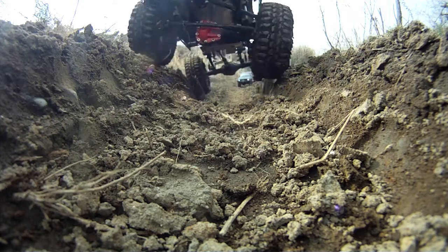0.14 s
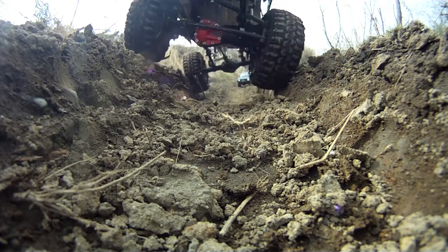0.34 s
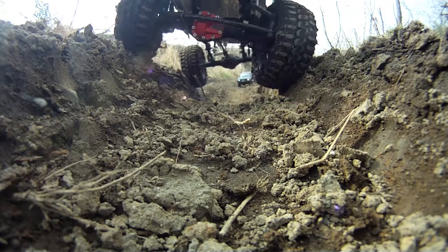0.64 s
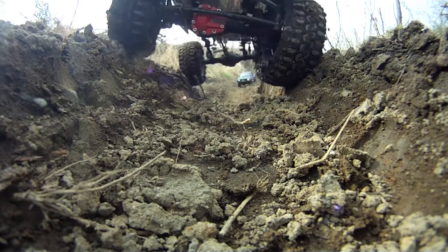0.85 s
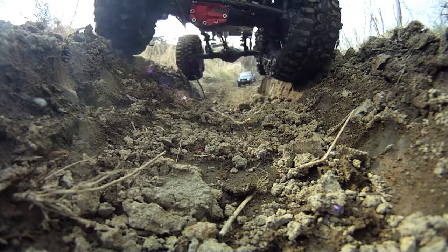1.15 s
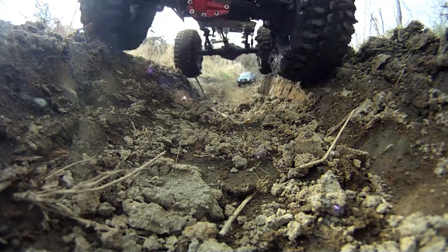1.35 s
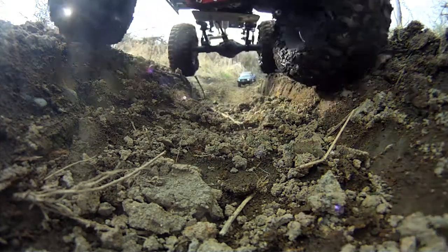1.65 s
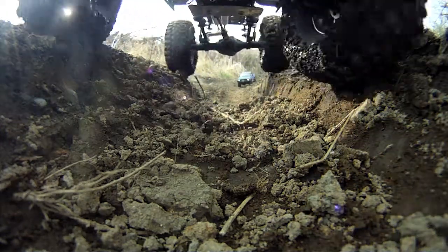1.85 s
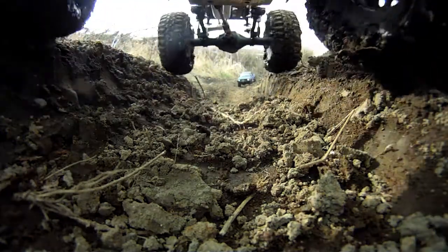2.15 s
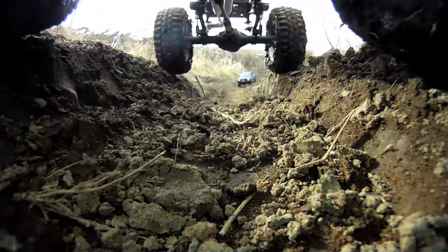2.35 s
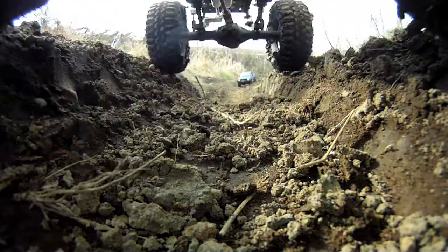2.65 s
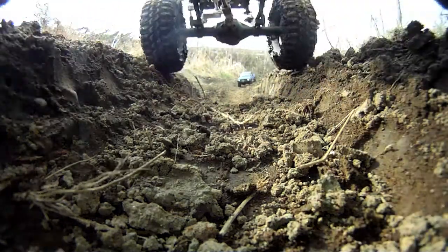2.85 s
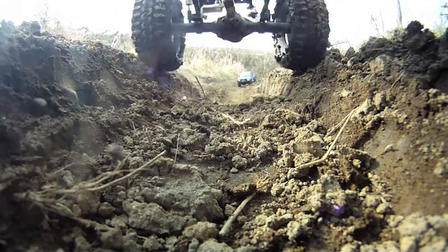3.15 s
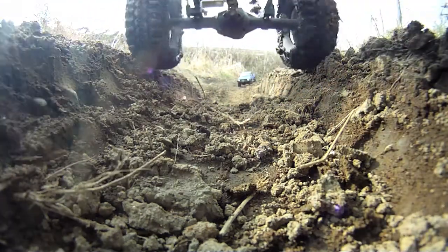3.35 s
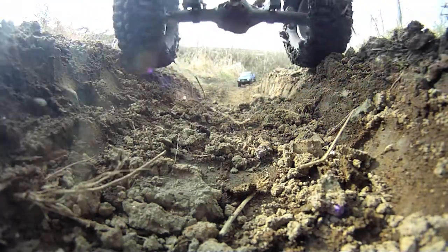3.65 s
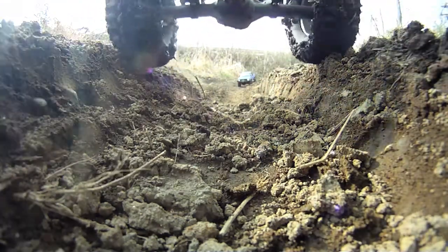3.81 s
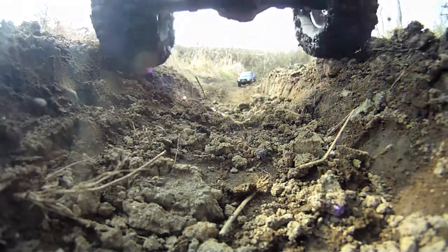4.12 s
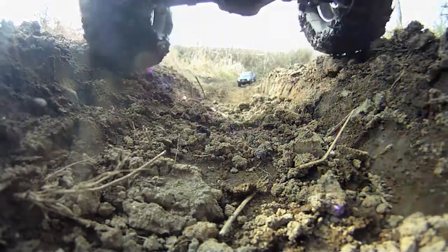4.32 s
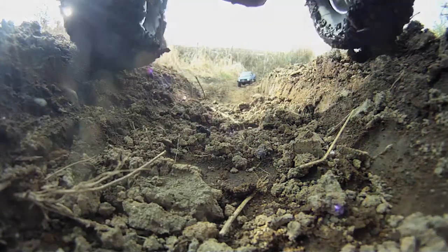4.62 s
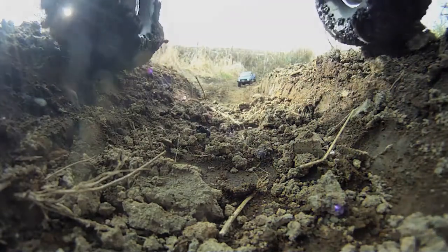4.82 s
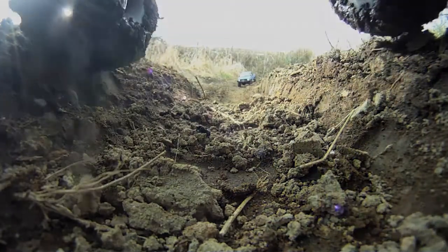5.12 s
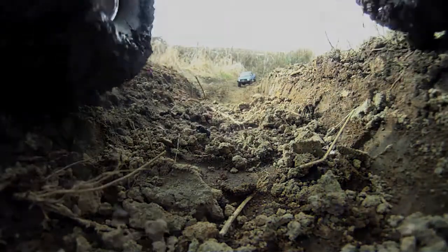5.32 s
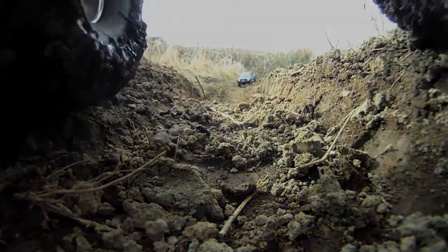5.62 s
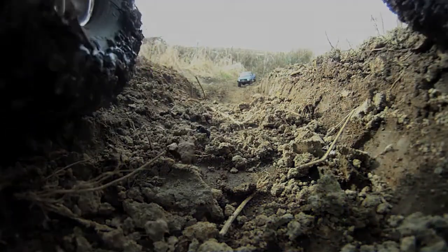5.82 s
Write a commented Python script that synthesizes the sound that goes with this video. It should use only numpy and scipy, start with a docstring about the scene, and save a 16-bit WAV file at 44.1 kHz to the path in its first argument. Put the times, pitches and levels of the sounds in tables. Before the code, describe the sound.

Thin gear whirring and a high whistle from a remote-controlled truck crawling overhead, with small clacks and one sharp pebble hit.

```python
"""Gear teeth rattle and sing as a small electric RC crawler creeps along a dirt rut, over a camera
on the ground. Front axle, gearbox and rear axle pass in turn, and the speed controller whistles over
soft outdoor air. Tyres scuff, crumbs of earth drop, the rear axle squeaks once, chassis panels buzz,
slack gears clack and one pebble cracks against the camera case. The camera's coarse sampling adds a
glassy edge."""
import sys
import numpy as np
from scipy import signal
from scipy.fft import rfft, irfft
from scipy.io import wavfile
from scipy.ndimage import uniform_filter1d

SR = 44100
rng = np.random.default_rng(int(sys.argv[2]) if len(sys.argv) > 2 else 0)


def put_to_file(sound):
    """Save the sound as 16-bit audio at rate SR, in the file named by the first command-line argument."""
    columns = np.atleast_2d(sound).T  # one column per channel
    safe = np.clip(columns, -1, 1)
    whole_steps = np.round(safe * 32767)
    wavfile.write(sys.argv[1], SR, whole_steps.astype(np.int16))


N = 263277
T = np.arange(N) / SR
CAMERA_RATE_HZ = 12000
PINION_TEETH, COMMUTATOR_BARS = 10, 3
OVERHEAD_S, CROSSING_S = 3.74, 2.5  # whole truck


def undb(db):
    """Decibels to gain."""
    return 10 ** (np.asarray(db) / 20)


def unit(x):
    """Scale to rms 1."""
    return x / np.sqrt(np.mean(x ** 2))


def curves(table):
    """Table columns, linearly interpolated in time."""
    times, *columns = np.transpose(table)
    return [np.interp(T, times, column) for column in columns]


def walk(rate_hz):
    """Random wander, rms 1."""
    knots = rng.standard_normal(4096)
    return unit(np.interp(T * rate_hz, np.arange(len(knots)), knots))


def bump(time_s, length_s):
    """Bell-shaped swell, height 1."""
    return np.exp(-(2 * (T - time_s) / length_s) ** 2)


def nearness(overhead_s, crossing_s, db_per_doubling=-20):
    """Pass-over gain, steep as the rut walls shade the source; it travels its height in crossing_s."""
    distance = np.hypot(1, (T - overhead_s) / crossing_s)
    return undb(db_per_doubling * np.log2(distance))


def band(x, hz, width_hz):
    """Resonator applied twice for steep skirts; centre gain 1."""
    b, a = signal.iirpeak(hz, hz / (1.55 * width_hz), fs=SR)
    return signal.lfilter(b, a, signal.lfilter(b, a, x))


def ring(force, resonances):
    """Driven resonances, levelled to a running rms of 1."""
    y = sum(undb(db) * band(force, hz, width_hz) for hz, width_hz, db in resonances)
    return y / np.sqrt(uniform_filter1d(y ** 2, size=5000) + 1e-18)


def add(out, time_s, sound, peak_db):
    """Mix in a short sound at the given peak."""
    i = int(time_s * SR)
    out[i:i + len(sound)] += (undb(peak_db) * sound / np.abs(sound).max())[:N - i]


def grains(rate_hz, spread_db):
    """Random clicks, mostly small, a few large."""
    hits = rng.random(N) < rate_hz / SR
    return hits * undb(spread_db * np.minimum(rng.exponential(size=N), 3))


# gear speed (time [s], mesh rate [Hz])
GEAR_SPEED = [(0, 243.6), (.75, 252), (1.25, 319.8), (1.45, 341.7), (1.56, 331.8), (1.76, 349.3),
              (1.88, 331.3), (1.98, 358), (2.25, 311.9), (2.65, 229.4), (2.98, 270), (3.12, 247.8),
              (3.35, 300.1), (3.72, 200.9), (4.12, 245.7), (4.5, 199.9), (4.97, 200.4), (5.28, 320),
              (5.44, 183), (5.97, 217.7)]


def mesh_rate():
    """Teeth engaging per second."""
    return curves(GEAR_SPEED)[0]


def tooth_force(teeth_passed, rolling, scatter_db=4, slop_teeth=0.13, rub=0.51, wear=0.8):
    """An even push per tooth when rolling; otherwise loose taps and rubbing."""
    tooth = np.arange(1, int(teeth_passed[-1]))
    # each pinion tooth's own error repeats once per motor turn
    own_error = rng.standard_normal((PINION_TEETH, 2))
    own_error = (own_error - own_error.mean(axis=0)) / own_error.std(axis=0)
    random_error = rng.standard_normal((4096, 2))[tooth]
    error = wear * own_error[tooth % PINION_TEETH] + np.sqrt(1 - wear ** 2) * random_error
    timing, strength = error.T
    tap_at = np.interp(tooth + slop_teeth * timing, teeth_passed, np.arange(N)).astype(int)
    taps = np.zeros(N)
    taps[tap_at] = undb(scatter_db * np.clip(strength, -2, 2))
    rubbing = rng.standard_normal(N) * np.exp(-2 * (teeth_passed % 1))
    loose = unit(unit(taps) + rub * unit(rubbing))
    even = unit(np.diff(np.floor(teeth_passed), prepend=0))
    return rolling * even + np.sqrt(1 - rolling ** 2) * loose


# part resonances (frequency [Hz], width [Hz], gain [dB])
FRONT_AXLE_MODES = [(3665, 214, 4.5), (3786, 54, 0.5), (3848, 40, 4), (4550, 670, -15)]
GEARBOX_MODES = [(2877, 94, 7.5), (3353, 100, 14.5), (3411, 63, 18.5), (4550, 300, -2), (5230, 560, -10)]
REAR_AXLE_MODES = [(2164, 26, 5.5), (2263, 120, 9.5), (2397, 130, -5), (2670, 130, -16), (4030, 770, -11.5)]
CHASSIS_MODES = [(624, 42, -5.5), (793, 49, -5), (1534, 110, -9), (1678, 170, -2.5), (1947, 87, -1.5)]
MOTOR_CAN_MODES = [(1062, 49, -0.5), (1120, 56, -6)]
# pass of each part above, same order
# (overhead [s], crossing [s], direct gain [dB], frame-borne gain [dB], tightness [0-1])
PART_PASSES = [(1.82, 0.97, -53, -56, 0.96), (3.1, 1.35, -52, -54, 1), (4.53, 1.63, -54, -58, 0.73),
               (2.0, 1.0, -65, -62, 0.53), (2.95, 3.3, -64.5, -73, .7)]
# evenness of the mesh (time [s], rolling share [0-1])
ROLLING_SHARE = [(0, 0.75), (1.2, 0), (1.42, 0.45), (2.0, 0.4), (2.35, 0.72), (2.6, 0.28), (3.8, 0.51),
                 (5.97, 0.3)]
# load climbing (+) or leaving (-) a lump
# (time [s], length [s], front axle and gearbox gain [dB], rear axle gain [dB])
LUMP_LOADS = [(1.03, 0.2, -5, 0), (1.5, 0.23, 0.5, 0.5), (1.92, .12, -4, -3), (2.15, 0.36, 3, -0.5),
              (2.377, 0.13, -5, -6), (2.63, 0.16, 3.5, -1.5), (3.09, 0.13, 4, -2), (3.427, 0.068, 4.5, 4),
              (4.154, .2, 1, 0.5), (4.55, 0.29, -2, 0), (4.77, .2, -4, 2), (5.34, 0.78, 6, 3),
              (5.25, 0.17, 3.5, 4.5), (5.97, 0.14, -7, 1.5)]


def drivetrain(mesh_hz, flutter=0.003, judder_db=1.65, db_per_octave=2.5, cruise_hz=265):
    """The gears shake five parts of the truck, louder with speed, load and nearness."""
    teeth_passed = np.cumsum(mesh_hz * (1 + flutter * walk(60))) / SR
    rolling = np.clip(curves(ROLLING_SHARE)[0], 0, 0.95)
    frame = nearness(OVERHEAD_S, CROSSING_S)
    front_db = sum(db * bump(time_s, length_s) for time_s, length_s, db, _ in LUMP_LOADS)
    rear_db = sum(db * bump(time_s, length_s) for time_s, length_s, _, db in LUMP_LOADS)
    parts = ((FRONT_AXLE_MODES, front_db), (GEARBOX_MODES, front_db), (REAR_AXLE_MODES, rear_db),
             (CHASSIS_MODES, 0), (MOTOR_CAN_MODES, 0))
    sound = np.zeros(N)
    for (modes, load_db), part_pass in zip(parts, PART_PASSES):
        overhead_s, crossing_s, direct_db, frame_db, tightness = part_pass
        direct = undb(direct_db) * nearness(overhead_s, crossing_s)
        gain = undb(load_db) * np.hypot(direct, undb(frame_db) * frame)
        sound += gain * ring(tooth_force(teeth_passed, rolling * tightness), modes)
    speed_db = db_per_octave * np.log2(mesh_hz / cruise_hz)
    lug_db = judder_db * walk(45)  # tread lugs load the gears unevenly
    return sound * undb(speed_db + lug_db)


# whistle's octave, following the throttle (time [s], relative level [dB], ripple depth [dB])
WHISTLE_OCTAVE = [(0, -88, 6), (.95, -92, -14), (1.4, -79.5, -16), (2.1, -78.5, -15), (2.7, -81.5, 0),
                  (3.3, -78, -10), (3.52, -70.5, -16), (3.69, -83, -11), (4.0, -66.5, -14),
                  (4.5, -68.5, -7.5), (4.8, -67, -2), (5.08, -69.5, 1), (5.27, -81.5, 9.5), (5.97, -77, -5)]


def controller_whistle(mesh_hz, switch_hz=2966, tone_db=-62, sap_db=-6, octave_gain_db=9, waver_db=0.9):
    """Switched current makes the motor sing; commutator bars ripple the octave and sap the tone."""
    level_db, depth_db = curves(WHISTLE_OCTAVE)
    ripple = undb(level_db + depth_db)
    phase = 2 * np.pi * switch_hz * T
    motor_turns = np.cumsum(mesh_hz) / SR / PINION_TEETH
    commutation = 1.2 * np.cos(2 * np.pi * COMMUTATOR_BARS * motor_turns)
    tone = undb(tone_db + sap_db * ripple / ripple.max()) * np.sin(phase)
    tone *= nearness(overhead_s=4.05, crossing_s=3.2)
    octave = undb(octave_gain_db) * (undb(level_db) + ripple * commutation) * np.sin(2 * phase)
    return np.sqrt(2) * (tone + octave) * undb(waver_db * walk(11))


# background spectrum (frequency [Hz], relative density [dB])
AIR_SPECTRUM = [(15, -36), (30, -1.5), (50, 0), (100, -1), (200, -4.5), (450, -10), (1000, -13.5),
                (1900, -15.5), (2600, -15.5), (3600, -12.5), (4300, -18), (5800, -23)]


def air(level_db=-58, waver_db=0.6):
    """Low outdoor rush under thin microphone hiss."""
    freqs = np.fft.rfftfreq(N, 1 / SR)
    hz, db = np.transpose(AIR_SPECTRUM)
    colour = undb(np.interp(np.log(freqs + 1), np.log(hz), db)) * (freqs < CAMERA_RATE_HZ / 2)
    noise = unit(irfft(rfft(rng.standard_normal(N)) * colour, N))
    return noise * undb(level_db + waver_db * walk(9))


# rubber on the bank (time [s], length [s], level [dB])
TYRE_SCUFFS = [(0.119, 0.017, -52), (0.408, 0.073, -56.5), (1.793, 0.031, -59)]


def tyres(crunch_db=-71):
    """Rubber scuffs the bank; sparse soil grains crack under the lugs."""
    swell = sum(undb(db) * bump(time_s, length_s) for time_s, length_s, db in TYRE_SCUFFS)
    scuff = unit(band(grains(rate_hz=990, spread_db=5.5), hz=1750, width_hz=1200))
    crunch = unit(band(grains(rate_hz=80, spread_db=11), hz=1000, width_hz=1200))
    return swell * scuff + undb(crunch_db) * nearness(OVERHEAD_S, CROSSING_S) * crunch


# earth landing by the camera (time [s], relative peak [dB], centre [Hz])
CRUMB_FALLS = [(0.228, -50, 2300), (1.123, -51, 681), (1.321, -49, 883), (1.795, -46, 1110),
               (2.697, -51, 651), (2.959, -45.5, 630), (3.009, -43, 1050), (3.256, -44, 1967),
               (3.482, -42, 1621), (3.523, -43, 863), (3.791, -37, 1119), (3.795, -34, 1440),
               (3.827, -42.5, 632), (4.134, -38, 1250), (4.247, -43.5, 1439), (4.947, -43.5, 804),
               (5.244, -44.5, 900), (5.515, -43, 860), (5.903, -43.5, 1310)]


def crumbs(gain_db=1, crumble_s=0.0067, grit=0.2, relative_width=0.92):
    """Soft crumbs break up on the soil with a dull, dry tick."""
    out, t = np.zeros(N), T[:SR // 30]
    for time_s, db, hz in CRUMB_FALLS:
        force = grit * rng.standard_normal(len(t)) * np.exp(-t / crumble_s)
        force[0] += 1
        width_hz = relative_width * hz
        tick = band(band(force, hz, width_hz), hz, width_hz)
        add(out, time_s, tick, db + gain_db)
    return out


# one rear-axle squeak, then chassis panel buzzes (time [s], length [s], level [dB], resonance [Hz])
BRIEF_RESONANCES = [(1.028, 0.04, -58, 2230), (1.59, 0.12, -61, 1673), (2.09, 0.16, -60, 1649),
                    (2.36, 0.14, -59, 1690)]


def squeak_and_buzzes(mesh_hz, width_hz=110):
    """The gear teeth drive brief resonances: the rear axle once, then chassis panels."""
    force = tooth_force(np.cumsum(mesh_hz) / SR, rolling=0.6)
    return sum(undb(db) * bump(time_s, length_s) * ring(force, [(hz, width_hz, 0)])
               for time_s, length_s, db, hz in BRIEF_RESONANCES)


def axle_whine(mesh_hz, start_s=1.27, end_s=2.145, fade_s=0.09, resonance_hz=3665, width_hz=560,
               gain_db=-53.5, waver_db=2, flutter=0.00299, runout_rad=0.42):
    """The front axle pulls hard and sings the mesh overtones nearest its resonance."""
    phase = 2 * np.pi * np.cumsum(mesh_hz * (1 + flutter * walk(40))) / SR
    sway = runout_rad * np.sin(phase / PINION_TEETH)  # off-centre pinion
    song = np.zeros(N)
    for order in (10, 11, 12):
        detuning = 2 * (order * mesh_hz - resonance_hz) / width_hz
        song += np.exp(-detuning ** 2) * np.sin(order * phase + sway)
    gate = np.clip(np.minimum(T - start_s, end_s - T) / fade_s, 0, 1)
    return np.sqrt(2) * gate * undb(gain_db + waver_db * walk(29.7)) * song


# gear slack snapping shut (time [s], relative peak [dB], ring centre [Hz])
BACKLASH_CLACKS = [(3.0694, -38, 3332), (3.4496, -37, 3320), (3.7035, -33, 3449), (4.1044, -49, 2213),
                   (4.7137, -33.5, 2294), (4.8449, -30.5, 2341), (5.131, -30.5, 2348), (5.2006, -38, 2264),
                   (5.2074, -32, 2298), (5.2954, -34, 2205), (5.3073, -27.5, 3368)]


def backlash(gain_db=-5, chatter=0.061, contact_s=0.0041, focus_octaves=0.46):
    """Slack teeth knock, chatter and ring the axles and gearbox."""
    out, t = np.zeros(N), T[:SR // 20]
    for time_s, db, centre_hz in BACKLASH_CLACKS:
        force = chatter * rng.standard_normal(len(t)) * np.exp(-t / contact_s)
        force[0] += 1
        clack = np.zeros(len(t))
        for hz, width_hz, mode_db in FRONT_AXLE_MODES + GEARBOX_MODES + REAR_AXLE_MODES:
            focus = np.exp(-(np.log2(hz / centre_hz) / focus_octaves) ** 2)
            clack += undb(mode_db) * focus * band(force, hz, width_hz)
        add(out, time_s, clack, db + gain_db)
    return out


# camera case modes (frequency [Hz], gain [dB], t60 [s])
CASE_MODES = [(612, -20, 0.037), (830, -19.5, 0.047), (1076, -3, 0.026), (1420, 6, 0.015),
              (1900, 0.5, 0.022), (2360, -5, 0.027), (2730, -11.5, 0.028), (3643, 0.5, 0.017),
              (3850, -10, 0.027), (4300, -25, 0.0079), (5140, -1.5, 0.0067)]


def pebble(time_s=3.5963, peak_db=-6.5, spread_hz=1700, spread_q=0.54, low_hz=750, high_hz=4900):
    """A hard pebble rings the case; bending waves disperse in the shell and spread the crack."""
    out, t = np.zeros(N), T[:SR // 12]
    modes = sum(undb(db - 60 * t / t60_s) * np.cos(2 * np.pi * hz * t) for hz, db, t60_s in CASE_MODES)
    # the small shell radiates no bass; contact time rounds the top
    passband = signal.butter(3, [low_hz, high_hz], "bandpass", fs=SR, output="sos")
    radiated = signal.sosfilt(passband, modes)
    _, poles = signal.iirpeak(spread_hz, spread_q, fs=SR)
    crack = signal.lfilter(poles[::-1], poles, radiated)  # all-pass dispersion
    add(out, time_s, crack, peak_db)
    return out


def scene():
    """All sources at one microphone, the same in both channels."""
    mesh_hz = mesh_rate()
    gears = drivetrain(mesh_hz) + axle_whine(mesh_hz) + squeak_and_buzzes(mesh_hz)
    truck = gears + controller_whistle(mesh_hz) + backlash()
    mono = truck + crumbs() + pebble() + tyres() + air()
    return np.array([mono, mono])


def record(dry):
    """The camera's slow sample-and-hold mirrors the sound into the treble."""
    hold, top_hz = 4, 15250
    coarse = signal.resample_poly(dry, CAMERA_RATE_HZ, SR, axis=1)
    held = np.repeat(coarse, hold, axis=1)
    mirrored = signal.resample_poly(held, SR, hold * CAMERA_RATE_HZ, axis=1)[:, :N]
    lowpass = signal.ellip(10, 0.2, 70, top_hz, fs=SR, output="sos")
    return signal.sosfilt(lowpass, mirrored)


dry = scene()
out = record(dry)
put_to_file(out)
```